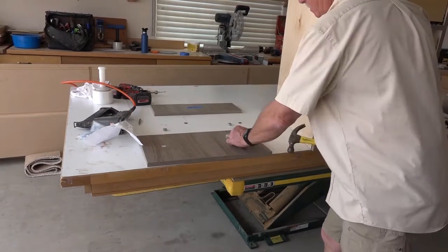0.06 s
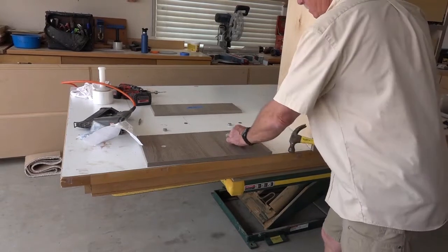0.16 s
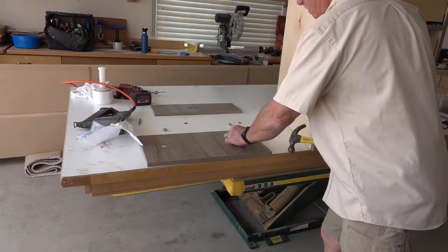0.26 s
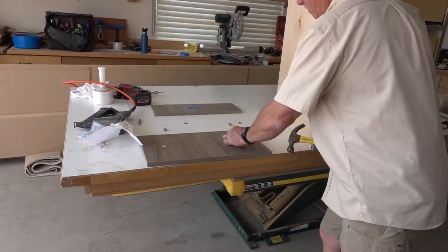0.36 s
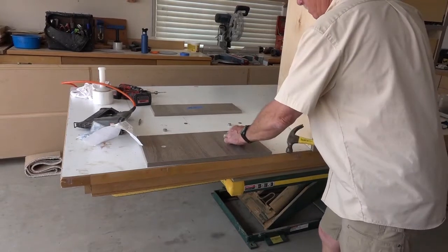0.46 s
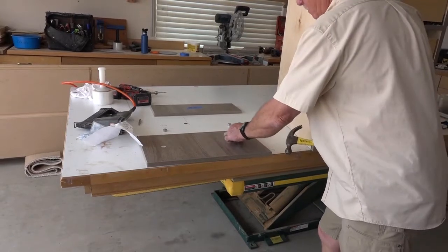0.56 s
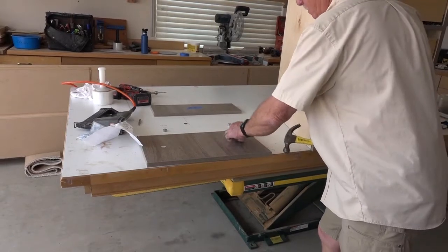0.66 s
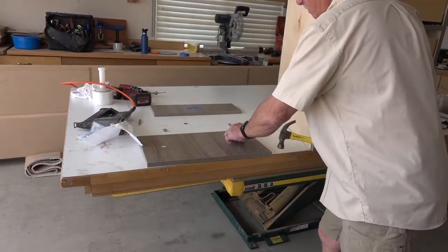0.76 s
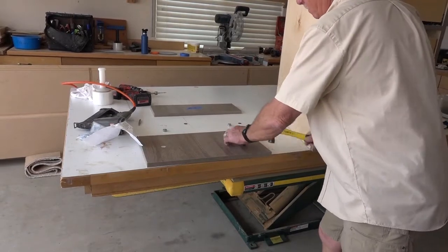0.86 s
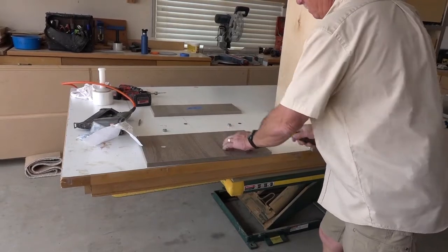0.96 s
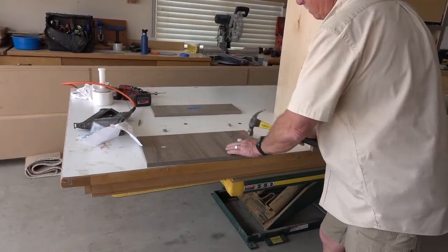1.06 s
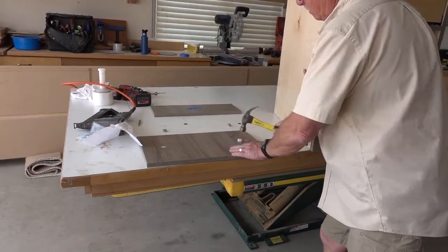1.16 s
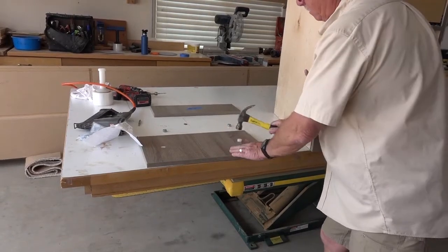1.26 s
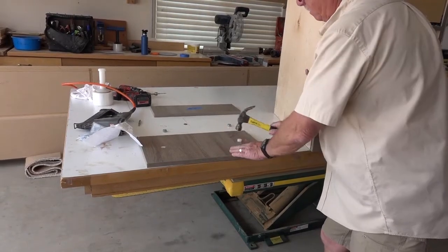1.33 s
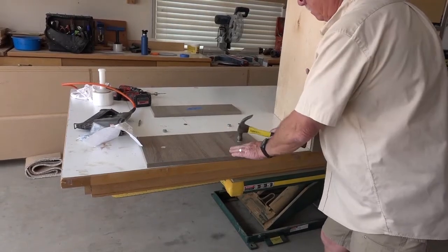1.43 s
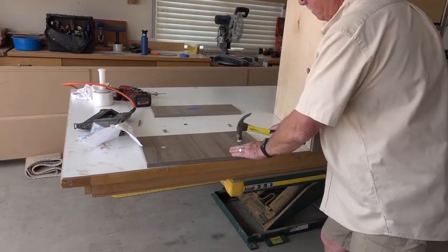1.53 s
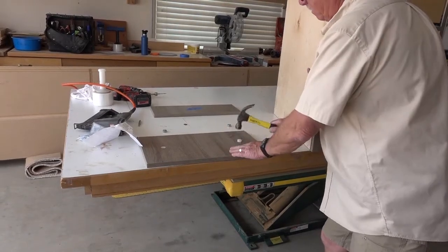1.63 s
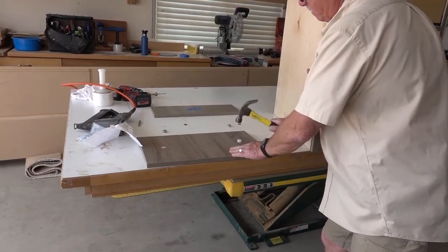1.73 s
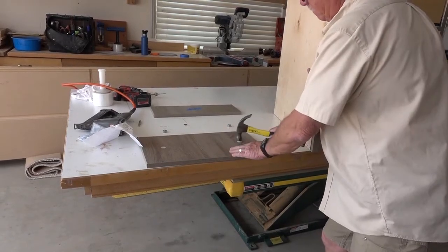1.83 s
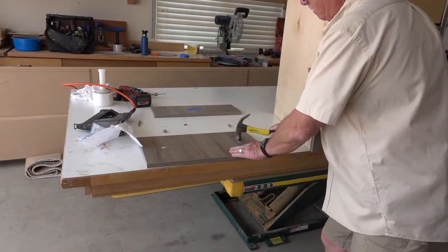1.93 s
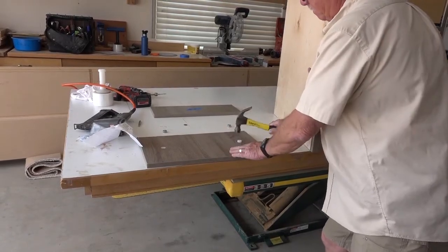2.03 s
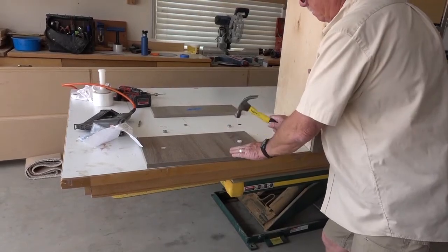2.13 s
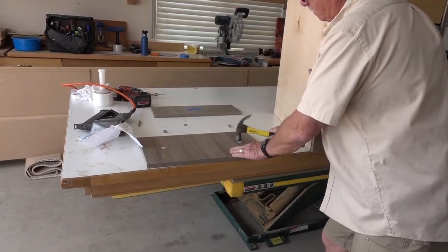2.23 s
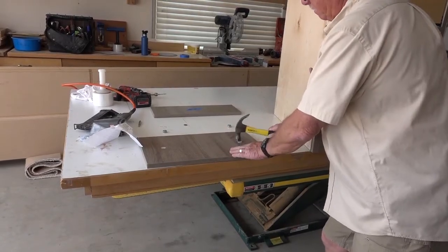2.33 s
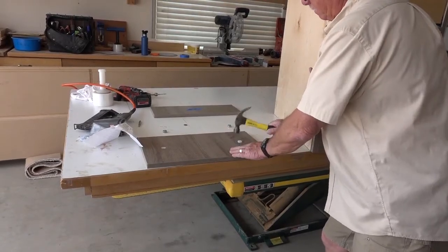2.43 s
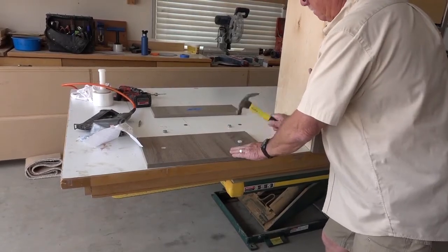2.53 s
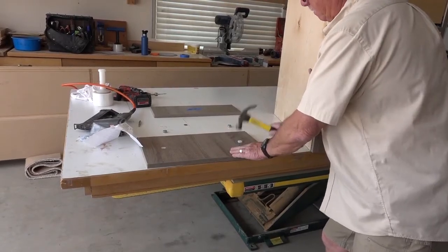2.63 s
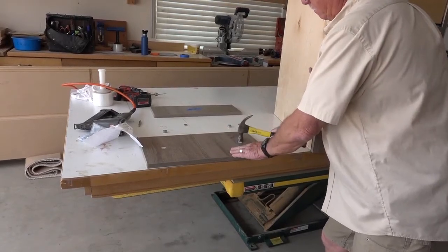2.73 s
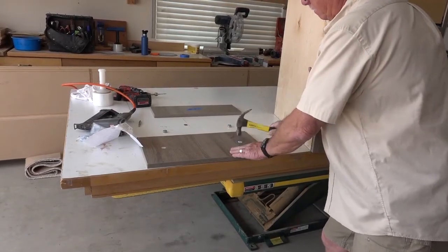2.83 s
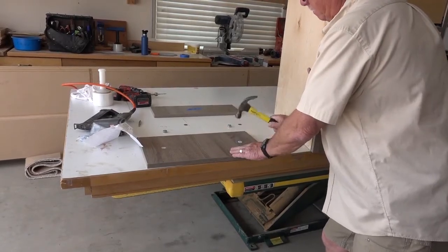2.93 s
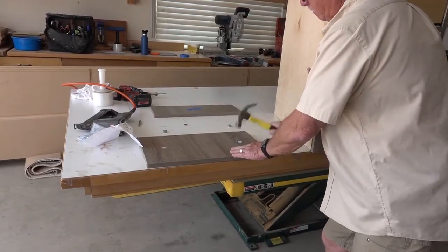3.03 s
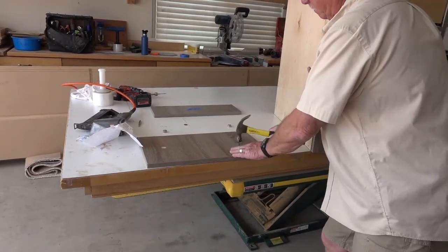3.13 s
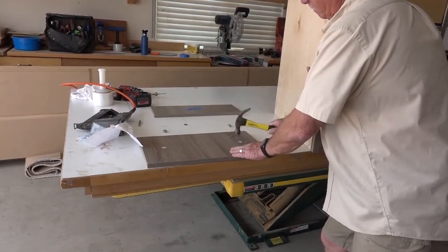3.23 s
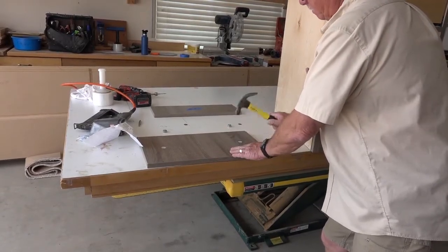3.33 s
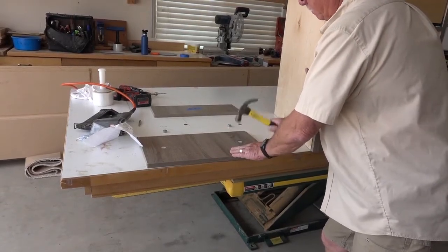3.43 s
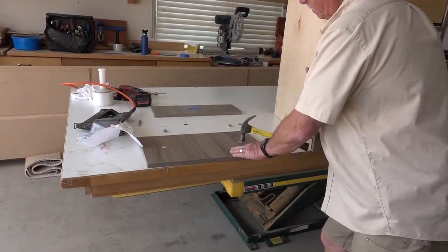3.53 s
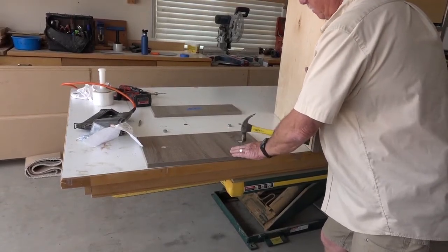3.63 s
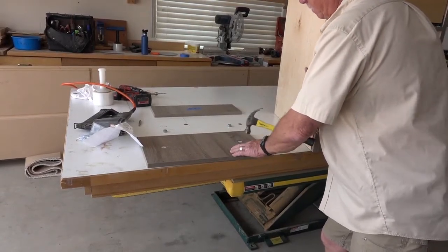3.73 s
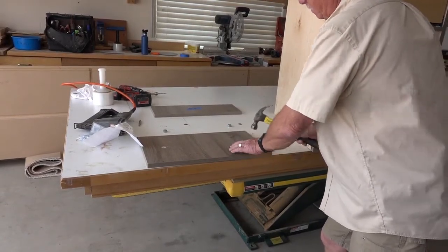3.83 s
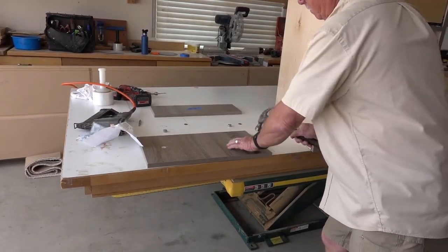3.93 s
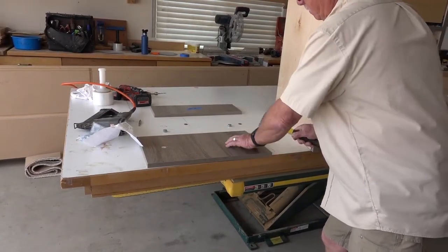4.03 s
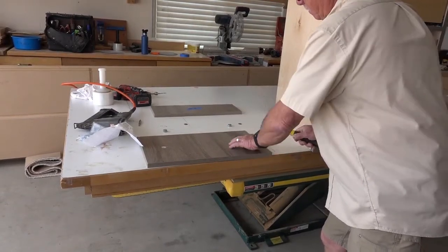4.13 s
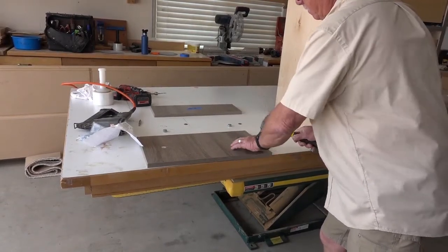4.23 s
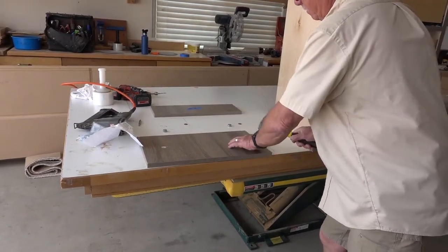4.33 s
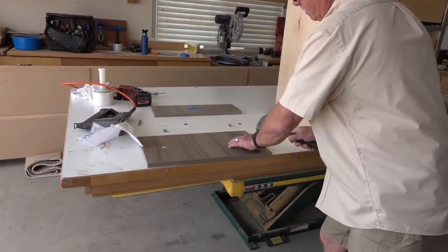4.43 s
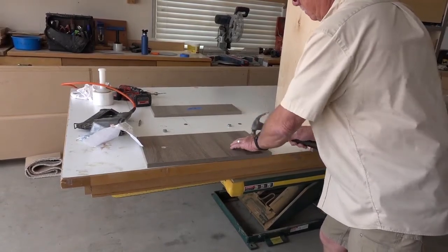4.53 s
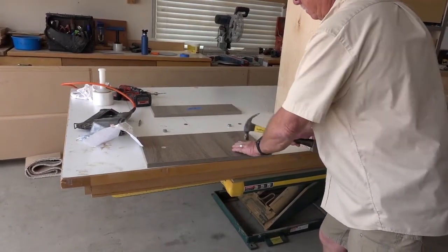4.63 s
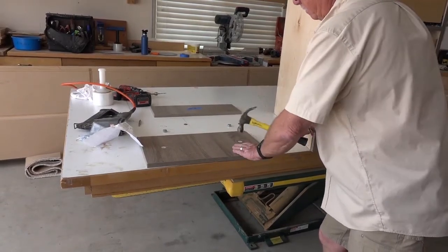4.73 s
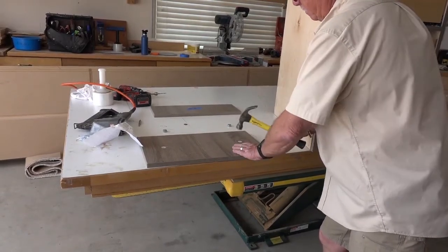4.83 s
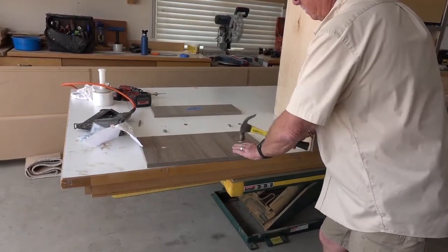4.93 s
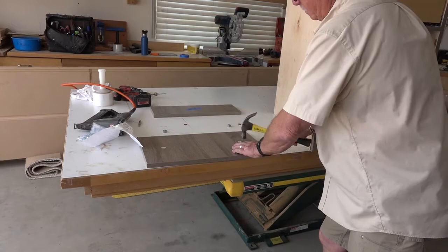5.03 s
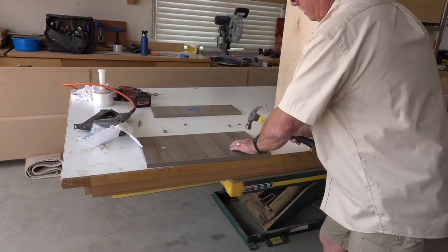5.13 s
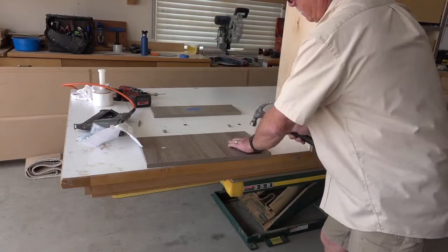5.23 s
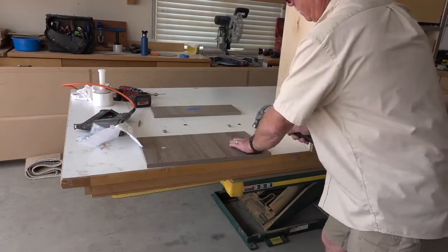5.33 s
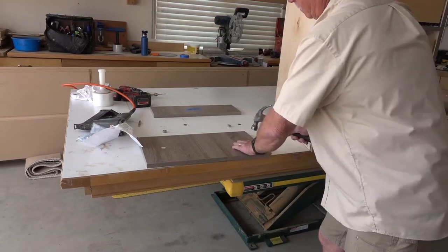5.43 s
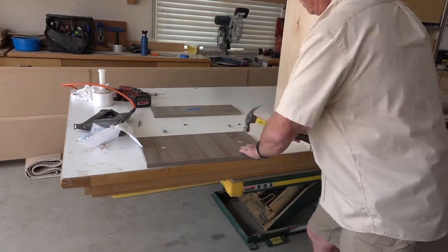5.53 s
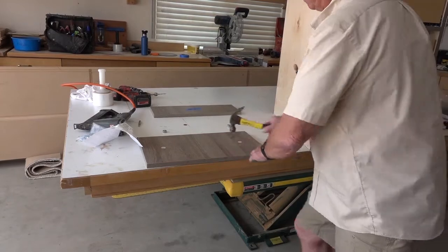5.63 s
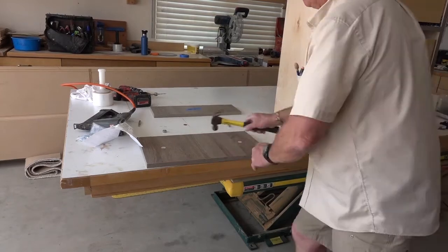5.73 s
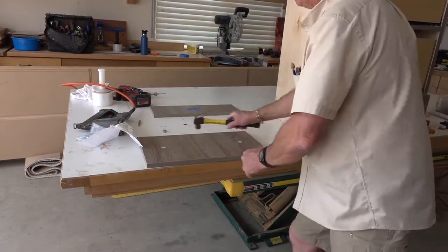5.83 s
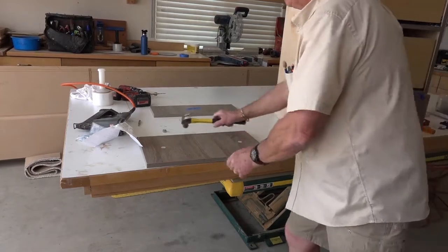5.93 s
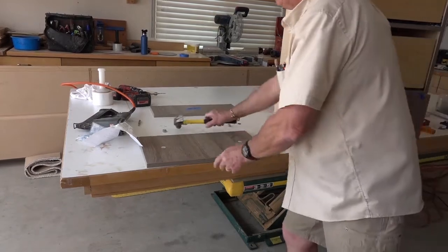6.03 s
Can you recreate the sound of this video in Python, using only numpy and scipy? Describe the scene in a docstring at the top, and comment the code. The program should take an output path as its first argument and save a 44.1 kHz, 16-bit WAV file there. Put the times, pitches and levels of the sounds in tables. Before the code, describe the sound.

Faint traffic and a couple of light touches give way to loud, close hammering on a wooden panel. Six blows come in a steady run, the bench and workshop ringing briefly after each, and a single blow follows a short gap. A shirt brushes softly and a shoe slides on the concrete floor at the end, while a small bird chirps very faintly outside.

```python
"""A claw hammer, close to the microphone, drives small fittings into a wooden panel lying on a bench:
six quick blows, a pause, one more. Panel, bench and bare workshop ring after each blow, and a limiter
holds the ring up as a plateau. From outside come distant traffic and a small bird; early on there is
one faint, high whistle. The worker's shirt brushes as an arm moves, and at the end the worker shifts
and steps back on the concrete floor."""
import sys
import numpy as np
from scipy import signal
from scipy.fft import rfft, irfft, next_fast_len
from scipy.io import wavfile
from scipy.ndimage import uniform_filter1d

SR = 44100
rng = np.random.default_rng(int(sys.argv[2]) if len(sys.argv) > 2 else 0)


def unload_audio(sound):
    """Save the sound as a 16-bit wav file, at the path given as the first command line argument."""
    columns = np.transpose(np.atleast_2d(sound))
    # keep every value between -1 and 1, then stretch to whole-number steps
    steps = np.round(np.clip(columns, -1, 1) * 32767)
    wavfile.write(sys.argv[1], SR, steps.astype(np.int16))


N = 267687
TIME = np.arange(N) / SR

# The hammer blows. Each row: start in seconds, then strength, body, crack and tick in dB,
# delay of the seating click in seconds, crunch in dB.
BLOWS = [(1.4481, -5.5, 3, -5.5, 0, 0.0024, 7.5), (1.844, -2, 3.5, 0.5, 5, 0.0044, 5.5),
         (2.2806, 4.5, 0, -0.5, -1.5, 0.0035, 1), (2.7015, 5, 0, -3, 0.5, 0.0043, 7),
         (3.1070, 5, -2.5, -3, -1, 0.0022, 2), (3.5209, 5, 4, 0, -4, 0.0039, 4),
         (4.9319, 3, 3, -3, -7, 0.0053, -21.5)]
# Where a blow is shaded, in Hz: thump, low knock, body, a neutral point, crack, tick.
BLOW_BANDS_HZ = [200, 370, 600, 1200, 2500, 8000]
# What panel and bench radiate when struck. Each row: frequency in Hz, spectral level in dB.
PANEL_SPECTRUM = [(40, -48), (75, -6.5), (120, -6.5), (160, 4), (280, 6), (440, -3), (590, 3), (800, 0.5),
                  (1100, 0), (2000, -7), (3000, -8.5), (4000, -16.5), (7000, -25.5), (11000, -33.5)]
# Tones of panel, bench and room; the last four are the panel's short woody knock.
# Each row: frequency in Hz, relative level in dB, seconds to fall 60 dB.
RING_MODES = [(140, -1, .55), (164, 2, .55), (206, -9, 1.1), (285, -4, .5), (315, -4, .46), (532, -3, .5),
              (565, 0, .49), (594, 4, .48), (684, 2, .45), (728, 1, .45), (888, -1, .55), (1013, -1, .5),
              (1046, 1, .48), (1172, -28, 2.0), (1195, -8, .5), (1269, -8, .5), (1363, -7, .48),
              (1878, -15, .5), (605, 16, .16), (700, 16, .13), (800, 13, .12), (1030, 12, .12)]
# Colour of the short path from panel to microphone. Each row: frequency in Hz, gain in dB.
NEAR_COLOUR = [(100, -7), (400, -4), (700, -1), (1500, -0.5), (3000, -3), (11000, -5.5)]
# The workshop's decay. Each row: frequency in Hz, seconds to fall 60 dB.
ROOM_T60 = [(100, 0.35), (250, 0.52), (700, 0.63), (1800, 0.55), (4500, 0.55), (10000, 0.42)]
# How its echoes build up. Each row: frequency in Hz, time constant in seconds.
ROOM_RISE = [(150, 0.15), (300, 0.033), (600, 0.01), (3000, 0.036)]
# How alike the room answers as the struck spot moves. Each row: frequency in Hz, share from 0 to 1.
ROOM_LIKENESS = [(200, 0.91), (900, 0.85), (2000, 0), (5000, 0.7)]
# Light touches of hand and foot. Each row: start in seconds, then relative level, thump, treble in dB.
TOUCHES = [(.334, -36, -15, 4), (.394, -41.5, -12, 11), (5.795, -39, 17, 14.5), (5.822, -32.5, -6, 10.5)]
# Slides of the sole. Each row: middle in seconds, length in seconds, level in dB.
SOLE_SLIDES = [(.16, 0.87, -68), (4.68, 0.3, -75.5), (5.61, 0.2, -58.5), (5.68, .1, -56.5),
               (5.825, 0.14, -51.5)]
# The sole's hiss on concrete. Each row: frequency in Hz, spectral level in dB.
SOLE_SPECTRUM = [(300, -4), (1100, 8), (2500, 4), (4500, -2.5), (6500, -17), (11000, -17)]
# The narrow bands where it rasps. Each row: centre in Hz, width in Hz, relative level in dB.
SOLE_RASP = [(1003, 70, -2), (1600, 120, 2), (2540, 51, -2), (2930, 60, -9), (4490, 90, -4)]
# Brushes of the shirt. Each row: middle in seconds, length in seconds, level in dB.
SHIRT_BRUSHES = [(1.1, 0.49, -64), (4.0, 0.17, -67.5), (4.17, 0.078, -69.5), (4.375, 0.053, -76),
                 (4.68, .3, -76.5), (5.57, 0.89, -65), (5.83, 0.088, -52.5)]
# Rubbing cloth. Each row: frequency in Hz, spectral level in dB.
SHIRT_SPECTRUM = [(1500, -11), (3500, -1.5), (6000, -8), (9500, 0.5), (11000, -3.5)]
# The bird's calls. Each row: start in seconds, level in dB before the room.
BIRD_CALLS = [(0.621, -47), (2.182, -45.5), (5.292, -57), (6.019, -57)]
# The fall of one chip. Each row: seconds into the chip, pitch in Hz.
CHIP_PITCH = [(0, 5703), (.012, 5351), (.022, 5166), (.045, 5122.5)]
# A car passing outside. Each row: time when nearest in seconds, length in seconds, level in dB.
CAR_PASSES = [(.45, 7, -49)]
# Tyres on a distant road. Each row: frequency in Hz, spectral level in dB.
TYRE_SPECTRUM = [(150, -0.5), (300, -13), (420, -8.5), (540, -10.5), (630, -5.5), (700, 7), (740, -8),
                 (780, 4.5), (870, -5.5), (1200, -8), (2000, -20), (3500, -29), (8000, -38)]
# The steady background of the place. Each row: frequency in Hz, spectral level in dB.
ROOM_TONE_SPECTRUM = [(20, -8.5), (38, -2), (55, -1.5), (80, -5), (115, 1), (170, -4.5), (300, -13.5),
                      (700, -24), (1200, -30.5), (2500, -42.5), (5000, -41.5), (11000, -40)]
# Stereo spread at the microphone. Each row: frequency in Hz, side minus mid in dB.
STEREO_WIDTH = [(60, -33.5), (190, -15), (350, -14), (630, -9), (1130, -9), (2030, -7.5), (3640, -6),
                (6550, -3), (11000, -3.5)]


def hammer(room_pattern, level_db=31, crunch_hz=1900, slip_s=0.0015):
    """Each blow shoves the panel; the fitting crunches into its hole and seats with a bright click."""
    out, t = np.zeros((2, N)), np.arange(1024) / SR
    highpass = signal.butter(2, crunch_hz, "high", fs=SR, output="sos")
    for start, strength, body, crack, tick, seat_delay, crunch in BLOWS:
        slips = rng.standard_normal(len(t)) ** 3 * t * np.exp(-t / slip_s)  # fibres giving way
        contact = slips / np.linalg.norm(slips)
        contact[round(seat_delay * SR)] += 1  # the fitting seats
        contact = amp(crunch) * signal.sosfilt(highpass, contact)
        contact[0] += 1  # the face of the hammer lands
        # the crunch is distinct only close by; the room blurs the whole blow into one wash
        close = signal.fftconvolve(contact[None], near_path(direct_db=-15))[:, :SR]
        paths = close + workshop_tail(room_pattern)
        pulse = click(lambda hz: curve(PANEL_SPECTRUM, hz) + blow_colour(hz, strength, body, crack, tick))
        add(out, start, amp(level_db + strength) * signal.fftconvolve(pulse[None], paths))
    return out


def blow_colour(hz, strength, body, crack, tick, thump_db=2.46, knock_db=-2):
    """One blow's shading in dB: the bench gives way under a hard blow, so the thump falls behind."""
    band_db = [thump_db - strength, body + knock_db, body, 0, crack, tick]
    return curve(list(zip(BLOW_BANDS_HZ, band_db)), hz)


def ringing(level_db=-26, rise_s=0.019, spot_db=2):
    """Panel, bench and room tones swell and die after each blow; their mix shifts with the struck spot."""
    t, out = np.arange(2 * SR) / SR, np.zeros(N)
    hz, db, t60 = np.transpose(RING_MODES)
    tones = amp(db - 60 * t[:, None] / t60) * np.exp(2j * np.pi * hz * t[:, None])
    for start, strength, body, crack, tick, *_ in BLOWS:
        spot_gains = amp(spot_db * rng.standard_normal(len(hz)))
        phases = np.exp(2j * np.pi * rng.random(len(hz)))
        gains = amp(level_db + strength + blow_colour(hz, strength, body, crack, tick))
        add(out, start, (tones @ (gains * spot_gains * phases)).real * (1 - np.exp(-t / rise_s)))
    return out


def near_path(direct_db, bench_db=-10, bench_t60=0.12, left_db=1):
    """What reaches the microphone first: the direct sound and its close scatter from the bench."""
    scatter = unit_rms(echoes() * amp(-60 * TIME[:SR] / bench_t60))
    response = amp(bench_db) * scatter / np.sqrt(SR)
    response[:, 0] += amp(direct_db)
    colour = click(lambda hz: curve(NEAR_COLOUR, hz))
    return signal.fftconvolve(response, colour[None])[:, :SR] * amp([[left_db], [0]])


def workshop_tail(room_pattern, gap_s=.006):
    """The bare room's diffuse answer: the bass builds up slowly and the middle rings longest."""
    hz, age, shared = signal.stft(room_pattern, SR, nperseg=256)
    fresh = signal.stft(echoes(), SR, nperseg=256)[2]
    alike = curve(ROOM_LIKENESS, hz)[:, None]
    bands = np.sqrt(alike) * shared + np.sqrt(1 - alike) * fresh
    bands *= amp(-60 * age / curve(ROOM_T60, hz)[:, None])
    bands *= 1 - np.exp(-age / curve(ROOM_RISE, hz)[:, None])
    bands /= np.sqrt((abs(bands) ** 2).sum(2).mean(0))[:, None]  # equal energy in every band
    tail = signal.istft(bands, SR, nperseg=256)[1]
    delayed = np.pad(tail, ((0, 0), (round(gap_s * SR), 0)))[:, :SR]
    return unit_rms(delayed) / np.sqrt(SR)


def echoes():
    """One second of dense, even reflections in stereo."""
    return noise([(1, 0)], size=SR)


def touches(level_db=25, scuff_t60=0.083):
    """Hand and foot knock lightly near the microphone, each contact spread over a short scuff."""
    out, t = np.zeros(N), np.arange(4096) / SR
    for start, db, thump, treble in TOUCHES:
        colour = [(200, thump), (700, 6.1), (4000, treble)]
        scuff = rng.standard_normal(len(t)) * amp(-60 * t / scuff_t60)
        knock = click(lambda hz: curve(PANEL_SPECTRUM, hz) + curve(colour, hz))
        add(out, start, amp(level_db + db) * signal.fftconvolve(knock, scuff / np.linalg.norm(scuff)))
    return out


def sole(rasp_db=-4, hiss_db=-0.5):
    """A sole slides on gritty concrete: a broad hiss with a few rasping resonances."""
    grit = noise([(1, 0)])
    rasp = np.zeros((2, N))
    for hz, width, db in SOLE_RASP:
        resonance = signal.iirpeak(hz, hz / width, fs=SR)
        rasp += amp(db) * unit_rms(signal.lfilter(*resonance, grit))
    return (amp(hiss_db) * noise(SOLE_SPECTRUM) + amp(rasp_db) * unit_rms(rasp)) * swells(SOLE_SLIDES)


def shirt():
    """Cloth rubs with a soft, high hiss as an arm moves."""
    return noise(SHIRT_SPECTRUM) * swells(SHIRT_BRUSHES)


def bird(waver_hz=55):
    """A small bird outside gives short falling chips, near-pure tones with a quick waver."""
    out, t = np.zeros(N), np.arange(0, CHIP_PITCH[-1][0], 1 / SR)
    for start, db in BIRD_CALLS:
        waver = unit_rms(uniform_filter1d(rng.standard_normal(len(t)), size=100))
        pitch = np.interp(t, *np.transpose(CHIP_PITCH)) + waver_hz * waver
        add(out, start, amp(db) * glide(pitch))
    return out


def traffic(road_db=-68):
    """Tyres hum steadily on a far road and swell as one car passes."""
    return noise(TYRE_SPECTRUM) * np.hypot(amp(road_db), swells(CAR_PASSES))


def whistle(start_s=.12, length_s=0.37, level_db=-73):
    """One thin, very high tone that arches up and sinks."""
    low_hz, top_hz, climb_s, sag_hz_per_s = 7850, 9720, 0.13, 7100
    out, t = np.zeros(N), np.arange(0, length_s, 1 / SR)
    climb = np.sin(np.pi / 2 * np.minimum(t / climb_s, 1))
    pitch = low_hz + (top_hz - low_hz) * climb - sag_hz_per_s * np.maximum(t - climb_s, 0)
    add(out, start_s, amp(level_db) * glide(pitch))
    return out


def room_tone(level_db=-60.5):
    """The low, steady hush of the workshop."""
    return amp(level_db) * noise(ROOM_TONE_SPECTRUM)


def swells(rows, linger_t60=0.24):
    """The gain of a series of movements: each rises and sinks in one arch, and lingers in the room."""
    middle, length, db = np.transpose(rows)[:, :, None]
    arches = np.cos(np.pi * np.clip((TIME - middle) / length, -.5, .5)) ** 2
    power = ((amp(db) * arches) ** 2).sum(0) + 1e-20
    linger = amp(-60 / (linger_t60 * SR)) ** 2
    return np.sqrt(signal.lfilter([1 - linger], [1, -linger], power))


def glide(pitch_hz):
    """A sine that follows a pitch curve, faded in and out."""
    return np.sin(2 * np.pi * np.cumsum(pitch_hz) / SR) * signal.windows.tukey(len(pitch_hz), .5)


def click(gain_db, size=4096):
    """The most abrupt pulse that has the spectrum gain_db(Hz)."""
    log_gain = np.log(amp(gain_db(abs(np.fft.fftfreq(size, 1 / SR)))))
    minimum_phase = np.exp(np.conj(signal.hilbert(log_gain)))
    return np.fft.ifft(minimum_phase).real[:size // 2]


def noise(spectrum, size=N):
    """Coloured stereo noise, nearly mono in the bass and wide in the treble."""
    padded = next_fast_len(size)
    hz = np.fft.rfftfreq(padded, 1 / SR)
    mid, side = rfft(rng.standard_normal((2, padded))) * amp(curve(spectrum, hz))
    side = side * amp(curve(STEREO_WIDTH, hz))
    return unit_rms(irfft([mid + side, mid - side], padded)[:, :size])


def amp(db):
    """Decibels to gain."""
    return 10 ** (np.asarray(db) / 20)


def curve(points, hz):
    """A table joined by straight lines over log frequency."""
    point_hz, value = np.transpose(points)
    return np.interp(np.log(hz + 1), np.log(point_hz), value)


def unit_rms(x):
    """Scales to an rms of one."""
    return x / np.sqrt(np.mean(x ** 2))


def add(mix, start_s, sound):
    """Lays a sound into the mix."""
    part = mix[..., round(start_s * SR):][..., :sound.shape[-1]]
    part += sound[..., :part.shape[-1]]


def held(over_db, recovery_db_per_s):
    """Jumps up with its input and sinks back at a steady rate."""
    fall = TIME * recovery_db_per_s
    return np.maximum.accumulate(over_db + fall) - fall


def scene(touch_room_db=-7, bird_room_db=-5):
    """From beside the bench: blows, touches and bird share one room, with the road far behind."""
    room_pattern = echoes()
    near, tail = near_path(direct_db=-4.5), workshop_tail(room_pattern)
    knocks = signal.fftconvolve(touches()[None], near + amp(touch_room_db) * tail)[:, :N]
    chips = signal.fftconvolve(bird()[None], near + amp(bird_room_db) * tail)[:, :N]
    background = chips + traffic() + whistle() + room_tone()
    worker = knocks + sole() + shirt()
    return hammer(room_pattern) + ringing() + worker + background


def record(dry, limit_db=-14, attack_s=0.00094, ceiling=.68, top_hz=11200):
    """A limiter after the microphone flattens each blow; soft clipping and a treble cut follow."""
    quick_db_per_s, slow_db_per_s, slow_share = 90, 7, 0.067  # it lets go in two stages
    power_db = 10 * np.log10(abs(uniform_filter1d((dry ** 2).mean(0), size=160)) + 1e-12)
    over_db = np.maximum(power_db - limit_db, 0)
    target_db = np.maximum(held(over_db, quick_db_per_s), held(slow_share * over_db, slow_db_per_s))
    lag = np.exp(-1 / (attack_s * SR))  # the first crack slips through before the gain drops
    duck_db = signal.lfilter([1 - lag], [1, -lag], target_db)
    limited = ceiling * np.tanh(dry * amp(-duck_db) / ceiling)
    lowpass = signal.firwin(401, top_hz, window=("kaiser", 8), fs=SR)
    return signal.oaconvolve(limited, lowpass[None], "same")


dry = scene()
out = record(dry)
unload_audio(out)
```